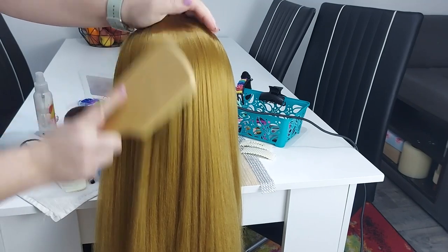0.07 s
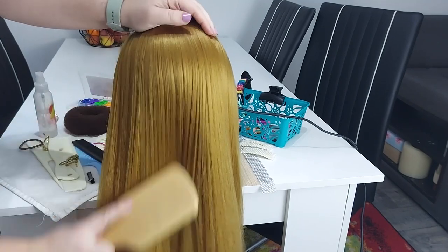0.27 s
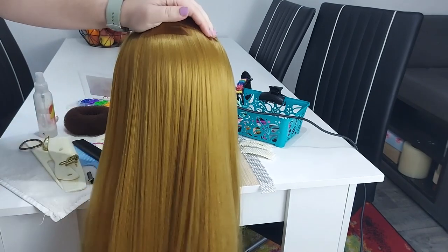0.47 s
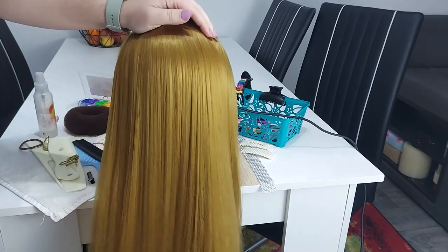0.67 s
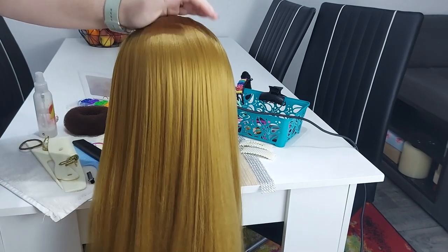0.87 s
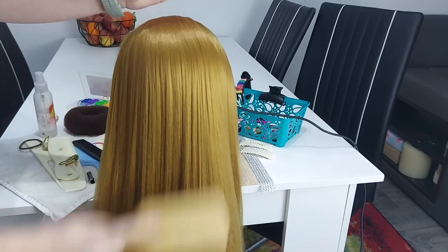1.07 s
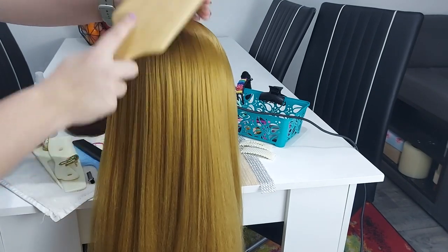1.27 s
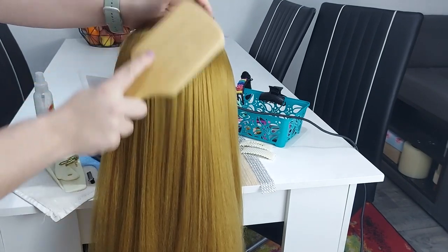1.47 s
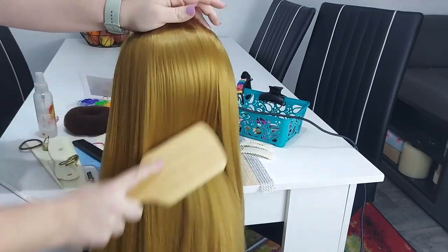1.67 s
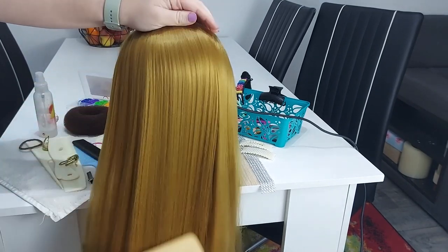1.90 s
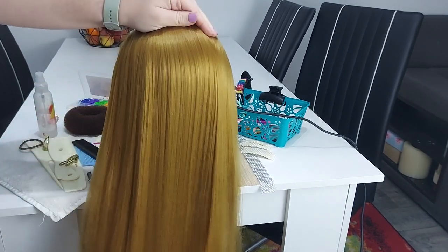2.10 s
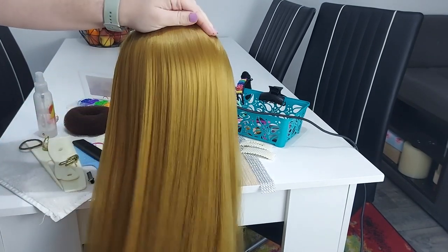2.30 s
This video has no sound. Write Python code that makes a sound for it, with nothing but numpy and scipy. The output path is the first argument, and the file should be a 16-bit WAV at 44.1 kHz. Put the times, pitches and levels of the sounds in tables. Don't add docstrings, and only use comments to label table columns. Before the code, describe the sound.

Hair brushing: two scratchy, swishing brush strokes through long strands over a hollow head, indoors

```python
import sys
import numpy as np
from scipy import signal
from scipy.fft import rfft, irfft
from scipy.io import wavfile
from scipy.ndimage import uniform_filter1d

SR = 44100
rng = np.random.default_rng(int(sys.argv[2]) if len(sys.argv) > 2 else 0)


def decibels_to_gain(level_db):
    exponent = np.asarray(level_db, float) / 20
    return 10 ** exponent


def waveform_to_disk(signal):
    frames = np.transpose(np.atleast_2d(signal))
    scaled = np.clip(frames, -1, 1) * 32767
    samples = np.round(scaled).astype(np.int16)
    wavfile.write(sys.argv[1], SR, samples)


N = 103414


def evened(x):
    return x / np.sqrt(np.mean(x ** 2) + 1e-20)


def smoothed(x, n):
    return uniform_filter1d(uniform_filter1d(x, n), n)


def levelled(x, over_s):
    return x / np.sqrt(smoothed(x ** 2, round(over_s * SR)) + 1e-12)


def ring(x, hz, width_hz):
    turn = np.exp(2j * np.pi * np.cumsum(hz * np.ones(len(x))) / SR)
    r = np.exp(-np.pi * width_hz / SR)
    return 2 * (turn * signal.lfilter([1 - r], [1, -r], x / turn)).real


def body(x, modes):
    out = np.zeros(len(x))
    for k, (hz, width_hz, db) in enumerate(modes):
        out += (-1) ** k * decibels_to_gain(db) * ring(x, hz, width_hz)
    return out


def coloured(x, points):
    hz, db = np.transpose(points)
    f = np.fft.rfftfreq(N, 1 / SR)
    gain_db = np.interp(np.log(f + 1), np.log(hz + 1), db)
    return irfft(rfft(x) * decibels_to_gain(gain_db), N)


def grains(per_s, spread_db, smooth):
    hit = rng.random(N) < per_s / SR
    size = decibels_to_gain(spread_db * np.minimum(rng.exponential(1, N), 3))
    clicks = hit * rng.standard_normal(N) * size
    return evened(clicks) + smooth * rng.standard_normal(N)


def flicker(width_s, depth_db):
    n = max(int(width_s * SR), 1)
    return decibels_to_gain(depth_db * evened(smoothed(rng.standard_normal(N), n)))


def arches(rows, peak, sharp):
    t, out = np.arange(N) / SR, np.zeros(N)
    bend = np.log(.5) / np.log(np.clip(peak, .05, .95))
    for start_s, length_s, level_db in rows:
        u = np.clip((t - start_s) / length_s, 0, 1) ** bend
        out += decibels_to_gain(level_db) * np.sin(np.pi * u).clip(0) ** sharp
    return out


def sung(rows, width_hz, over_s):
    start_s, length_s, _, pitch_hz = np.transpose(rows)
    hz = np.interp(np.arange(N) / SR, start_s + length_s / 2, pitch_hz)
    tone = ring(ring(rng.standard_normal(N), hz, width_hz), hz, width_hz)
    return levelled(tone, over_s)


# pitch_hz [Hz], level_db [dB per Hz]
ROOM_COLOUR = [(12, -14), (20, -11.5), (38, -18.5), (176, -34.5), (208, -39.5), (417, -30.5), (886, -27),
               (1080, -31), (15600, -44.5)]


def room_tone():
    x = coloured(rng.standard_normal(N), ROOM_COLOUR)
    high = signal.sosfilt(signal.butter(4, 500, "high", fs=SR, output="sos"), x)
    return decibels_to_gain(-70) * x / np.std(high)


# start_s [s], length_s [s], level_db [dB]
RAKE_STROKES = [
    (.0, 0.22, -47),
    (-.03, 0.045, -57),
    (.027, 0.0097, -51),
    (.6, 0.14, -59),
    (1.41, 0.068, -53.5),
    (1.49, 0.21, -46),
    (1.64, 0.1, -54),
    (2.198, 0.0047, -48),
    (2.5, .03, -61),
    (2.21, 0.087, -59.5),
]
# pitch_hz [Hz], width_hz [Hz], level_db [dB]
PADDLE_MODES = [(388, 150, -1.5), (1392, 108, -1), (1655, 59, 5), (1796, 80, 0), (1974, 204, -2),
                (2710, 480, -7), (4190, 630, -18)]


def paddle_rake():
    rake = levelled(body(grains(2500, 3.0, 1.07), PADDLE_MODES), 0.011)
    return rake * arches(RAKE_STROKES, 0.78, 0.89)


# time_s [s], level_db [dB]
PRESSURE_PASSES = [
    [(0, -66), (.03, -59), (.042, -47), (.16, -47), (.212, -56), (.225, -56), (.3, -54), (.34, -64)],
    [(.29, -85), (.33, -56.5), (.43, -44.5), (.47, -50.5), (.5, -46.5), (.59, -71.5)],
    [(.58, -73), (.63, -50.5), (.69, -43), (.76, -47.5), (.81, -61), (.95, -77)],
    [(1.352, -57.5), (1.365, -57.5), (1.4, -80)],
    [(1.421, -49), (1.45, -44.5), (1.47, -48.5), (1.51, -75)],
    [(1.5, -56), (1.535, -48.5), (1.56, -51.5), (1.62, -44), (1.69, -46), (1.74, -63.5), (1.8, -68)],
    [(1.72, -56.5), (1.8, -53.5), (1.86, -53.5), (1.9, -50), (2.05, -46), (2.11, -56), (2.19, -61)],
    [(2.2, -48), (2.25, -54.5), (2.272, -46.5), (2.325, -45.5), (2.36, -56)],
]
# time_s [s], pitch_hz [Hz]
CONTACT_PITCH = [(0, 820), (.13, 800), (.18, 640), (.45, 563), (.68, 740), (.78, 470), (1.42, 650),
                 (1.55, 496), (1.67, 620), (2.0, 590), (2.3, 560)]
# pitch_hz [Hz], width_hz [Hz], level_db [dB]
HEAD_MODES = [(537.3, 42, -1), (678, 40, 0), (751, 87, -3.5), (1007.7, 52, -8), (454, 62, -5),
              (1306, 1030, -17)]


def hollow_head():
    t = np.arange(N) / SR
    press = np.zeros(N)
    for curve in PRESSURE_PASSES:
        time_s, level_db = np.transpose(curve)
        press += decibels_to_gain(np.interp(t, time_s, level_db, left=-120, right=-120))
    hollow = body(grains(1500, 2.06, 0.47), HEAD_MODES)
    contact_hz = np.interp(t, *np.transpose(CONTACT_PITCH))
    hollow = hollow + decibels_to_gain(-5) * ring(hollow, contact_hz, width_hz=190)
    return levelled(hollow, 0.017) * press * decibels_to_gain(-2.5)


# start_s [s], level_db [dB], pitch_hz [Hz], fade_s [s to fall 60 dB]
TABLE_JOLTS = [
    (.0, -39, 31, 0.043),
    (1.441, -37.5, 27.4, 0.17),
    (1.95, -56, 35.5, 0.27),
    (2.041, -46.5, 28, 0.19),
]


def table_jolts():
    t, out = np.arange(N) / SR, np.zeros(N)
    for start_s, level_db, pitch_hz, fade_s in TABLE_JOLTS:
        u = np.maximum(t - start_s, 0)
        out += decibels_to_gain(level_db - 60 * u / fade_s) * np.sin(2 * np.pi * pitch_hz * u) * 2
    return out


# start_s [s], length_s [s], level_db [dB]
TABLE_CREEPS = [
    (0, 0.19, -53.5),
    (.5, 0.4, -64),
    (1.45, 0.47, -53),
    (1.9, 0.6, -64),
]


def table_rumble():
    rumble = ring(ring(rng.standard_normal(N), 30, 13), 30, 13)
    return levelled(rumble, 0.4) * arches(TABLE_CREEPS, 0.33, 0.29)


# start_s [s], crack_db [dB], knock_db [dB], sparkle_db [dB]
SNAG_HITS = [(0.004, -52, -60, -77), (0.072, -46.5, -39, -77), (0.1105, -59, -49, -71),
             (0.1311, -46.5, -38, -77), (0.143, -52, -50, -68), (0.155, -51, -46, -75),
             (0.164, -45, -47, -68), (0.171, -41, -55, -66), (0.181, -38, -47, -68),
             (0.188, -42.5, -50, -70), (0.193, -42, -54, -72), (0.200, -48, -42, -70),
             (1.5742, -43, -35, -73), (1.648, -42.5, -55, -66), (1.677, -43, -61, -75),
             (1.964, -61, -52, -70), (2.263, -49, -49, -70), (2.295, -52.5, -55, -70),
             (0.4084, -53, -34, -67), (0.4191, -45.5, -30.5, -60), (0.4804, -54, -32.5, -69),
             (0.634, -58, -50, -78), (0.6998, -46, -57, -81), (0.7622, -43, -65, -68),
             (1.1922, -58, -79, -76), (1.4267, -48.5, -31.5, -81), (1.4453, -49, -57, -92),
             (1.4576, -45.5, -65, -82), (1.5245, -45, -54, -78), (1.8075, -43, -39, -66),
             (1.8911, -49, -33, -61), (1.9165, -45, -46, -59), (1.939, -45.5, -75, -56),
             (1.9814, -37.5, -31, -48.5), (1.9914, -48, -45, -59), (2.0413, -42.5, -46, -46.5),
             (2.151, -57, -77, -76.5), (2.2013, -50.5, -39, -65), (2.2189, -46, -35.5, -67),
             (2.2578, -49, -47, -73), (2.2759, -48.5, -47, -66), (2.3246, -46, -59, -66)]
# pitch_hz [Hz], width_hz [Hz], level_db [dB]
CRACK_MODES = [(1260, 460, 3), (3360, 890, 1), (4400, 4100, -6)]


def snags():
    length = 220
    t = np.arange(length) / SR
    push = np.exp(-t / 0.00016)
    crack, knock, sparkle = np.zeros((3, N))
    for start_s, crack_db, knock_db, sparkle_db in SNAG_HITS:
        burst = rng.standard_normal(length)
        crumble = evened(burst * np.exp(-t / 0.0024) * (1 - np.exp(-t / 0.0006)))
        i = round(start_s * SR)
        crack[i:i + length] += decibels_to_gain(crack_db) * crumble
        knock[i:i + length] += decibels_to_gain(knock_db) * push
        sparkle[i:i + length] += decibels_to_gain(sparkle_db) * evened(crumble * np.exp(-t / 0.0012))
    dull = signal.butter(3, 5000, fs=SR, output="sos")
    crack = signal.sosfilt(dull, body(crack, CRACK_MODES))
    sparkle = ring(ring(sparkle, 13300, 4000), 13300, 4000)
    return decibels_to_gain(2.0) * crack + decibels_to_gain(15) * body(knock, HEAD_MODES) + decibels_to_gain(-1) * sparkle


# start_s [s], length_s [s], level_db [dB], pitch_hz [Hz]
STAND_SHUDDERS = [(0.004, .12, -57.5, 79), (.15, 0.13, -60.5, 70.7), (0.275, 0.056, -57, 78),
                  (0.347, 0.057, -62, 79.4), (0.421, 0.062, -44, 80), (0.489, 0.044, -46.5, 87),
                  (0.545, 0.085, -60, 86), (0.641, 0.034, -46.5, 84.5), (0.692, 0.06, -40, 72.6),
                  (0.764, 0.046, -43.5, 75.1), (.82, 0.062, -58.5, 71), (0.869, .06, -64, 69.5),
                  (0.957, 0.055, -80, 89), (1.417, 0.086, -43.5, 87.7), (1.502, 0.085, -53.5, 83.6),
                  (1.623, 0.15, -57.5, 90.7), (1.752, 0.068, -56, 93), (1.822, 0.074, -52, 85.1),
                  (1.904, 0.091, -42, 84.2), (1.997, 0.087, -41.5, 82.6), (2.065, 0.098, -47, 73),
                  (2.178, 0.046, -51.5, 78.4), (2.232, 0.041, -46.5, 84), (2.285, 0.057, -45.5, 74.5)]


def stand_shudder():
    rows = [r[:3] for r in STAND_SHUDDERS]
    return sung(STAND_SHUDDERS, 6, 0.029) * arches(rows, 0.51, 0.54)


# start_s [s], length_s [s], level_db [dB]
STRAND_SWISHES = [
    (.02, 0.32, -54),
    (.28, 0.28, -58.5),
    (.61, 0.28, -61),
    (1.41, 0.2, -62),
    (1.5, 0.3, -55),
    (1.72, 0.29, -56),
    (1.88, 0.3, -61),
    (2.19, 0.19, -64.5),
]
# pitch_hz [Hz], level_db [dB per Hz]
SWISH_COLOUR = [(600, -4), (1500, 1), (3000, -7), (5000, -11.5), (7500, -19), (15700, -30)]


def strand_swish():
    swish = evened(coloured(grains(4000, 5.2, 1.04), SWISH_COLOUR))
    return swish * arches(STRAND_SWISHES, 0.44, 1.53)


# start_s [s], length_s [s], level_db [dB]
STAND_BUZZES = [
    (.04, 0.079, -67.5),
    (.41, 0.19, -60.5),
    (.66, 0.16, -60.5),
    (1.42, 0.034, -74),
    (1.63, 0.12, -58.5),
    (1.81, 0.056, -65),
    (1.88, 0.054, -66),
    (1.96, .12, -56.5),
    (2.27, 0.076, -58),
]


def stand_buzz():
    buzz = ring(rng.standard_normal(N), 134.3, width_hz=10)
    return levelled(buzz, 0.01) * arches(STAND_BUZZES, 0.41, 0.48) * decibels_to_gain(0.5)


# start_s [s], length_s [s], level_db [dB], pitch_hz [Hz]
PAD_JUDDERS = [(0.042, 0.013, -49.5, 745), (0.071, 0.0091, -47, 732), (0.093, 0.0072, -49, 760),
               (0.11, 0.0053, -37.5, 787), (0.128, 0.0046, -46, 788), (0.135, 0.0065, -43, 788),
               (0.159, 0.01, -45.5, 705), (0.165, 0.015, -41.5, 660), (.183, 0.0081, -35, 647),
               (.191, 0.016, -38.5, 606), (0.205, 0.01, -35.5, 564), (.239, 0.0096, -49, 645),
               (0.404, 0.0043, -47, 748), (0.707, 0.0076, -45.5, 565), (0.763, 0.021, -45, 456),
               (1.418, .014, -48, 696), (1.531, .012, -41, 562), (1.576, .014, -49.5, 608),
               (1.596, 0.0093, -40.5, 585), (1.615, 0.013, -39.5, 572.6), (1.648, 0.024, -40, 677),
               (1.684, 0.0152, -42.5, 661), (1.883, 0.017, -48.5, 620), (2.007, 0.01, -38.5, 616),
               (2.041, 0.013, -40, 605), (2.058, 0.019, -45.5, 597), (2.268, 0.008, -47.5, 658),
               (2.281, 0.018, -45, 666), (2.306, 0.012, -50, 555), (2.31, 0.018, -46, 644)]


def judders():
    rows = [r[:3] for r in PAD_JUDDERS]
    return sung(PAD_JUDDERS, 46.3, 0.0041) * arches(rows, 0.29, 0.82)


# start_s [s], length_s [s], level_db [dB]
HAIR_END_PUFFS = [
    (.1, 0.33, -70),
    (.3, 0.22, -63.5),
    (.62, 0.25, -67),
    (1.55, 0.27, -64),
    (1.74, 0.24, -61.5),
    (1.9, 0.22, -64.5),
    (2.22, 0.25, -67.5),
]
# pitch_hz [Hz], level_db [dB per Hz]
AIR_COLOUR = [(2000, -34), (4500, 0), (7000, -1), (8900, 3.5), (10500, -3.5), (14000, -4.5), (15700, -6)]


def hair_ends():
    air = evened(coloured(grains(5000, 4.9, 1.0), AIR_COLOUR))
    return flicker(0.0086, 1.0) * air * arches(HAIR_END_PUFFS, 0.47, 1.0)


def walls(x):
    t = np.arange(SR // 2) / SR
    echoes = rng.standard_normal(len(t)) * (rng.random(len(t)) < .05)
    tail = echoes * decibels_to_gain(-60 * t / 0.3) * (t > .004)
    return signal.fftconvolve(x, tail / np.linalg.norm(tail))[:N]


def scene():
    tufts = flicker(0.011, 0.5)
    hair = hollow_head() + tufts * (paddle_rake() + strand_swish()) + hair_ends()
    near = hair + snags()
    singing = judders()
    echo = decibels_to_gain(-11.5) * walls(near + decibels_to_gain(-3.5) * singing)
    stand = stand_shudder() + stand_buzz() + table_rumble() + table_jolts()
    return (near + singing + echo + stand + room_tone())[None]


def low_pass(x):
    return signal.sosfilt(signal.butter(12, 15780, fs=SR, output="sos"), x)


def record(dry):
    notches = [np.concatenate(signal.iirnotch(60 * k, 15.6, SR)) for k in range(1, 9)]
    clean = signal.sosfilt(np.array(notches * 2), dry, axis=1)
    edge = signal.firwin(511, 15750, window=("kaiser", 9), fs=SR)[None]
    mix = signal.oaconvolve(clean, edge, "same")
    return low_pass(mix)


dry = scene()
out = record(dry)
waveform_to_disk(out)
```